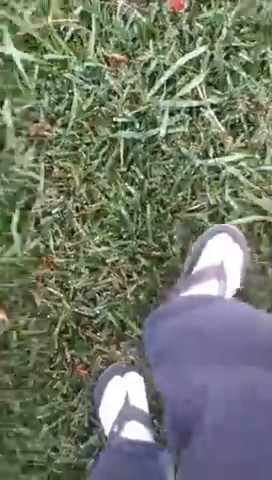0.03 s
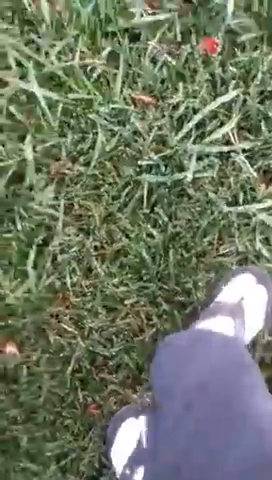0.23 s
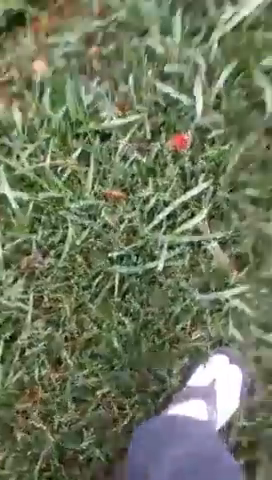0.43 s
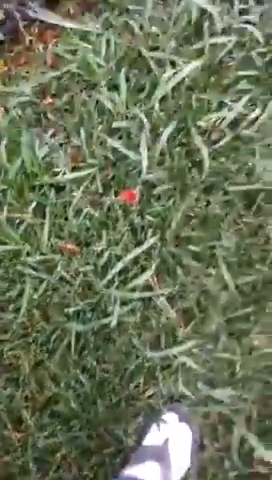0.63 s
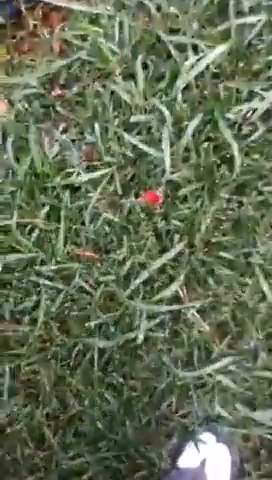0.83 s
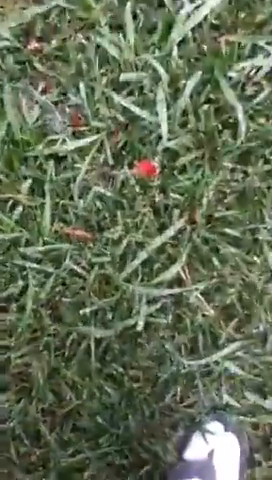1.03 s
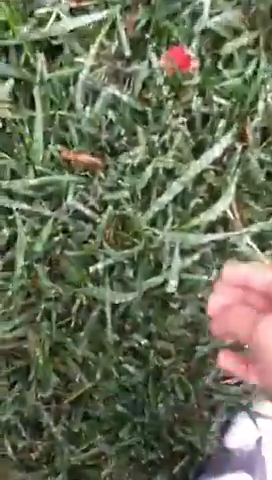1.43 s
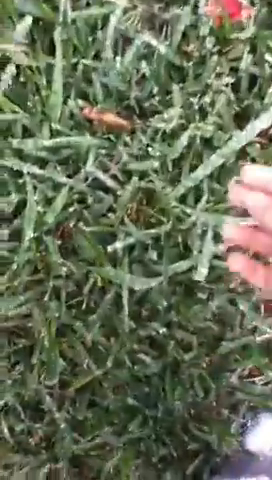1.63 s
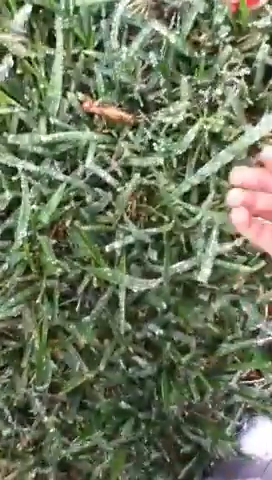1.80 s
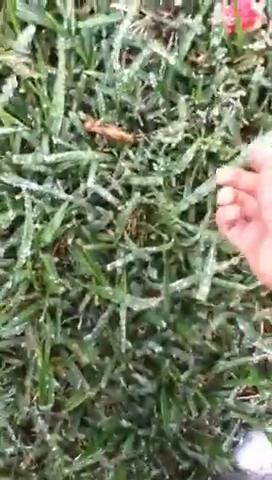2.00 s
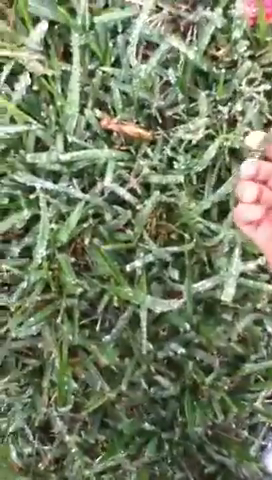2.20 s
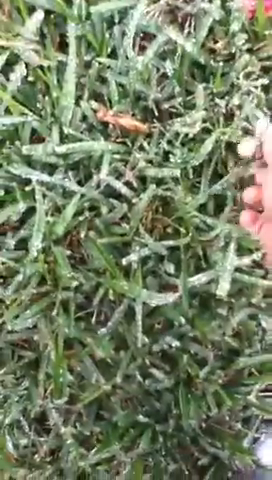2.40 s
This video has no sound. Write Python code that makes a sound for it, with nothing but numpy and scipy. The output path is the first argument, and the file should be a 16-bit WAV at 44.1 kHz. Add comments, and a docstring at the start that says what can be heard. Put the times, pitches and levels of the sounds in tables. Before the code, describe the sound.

Two slow footsteps crunch on stiff, frosty grass, heard from just above in the open air. Then clothes rustle faintly and fingers brush the frozen blades with small ticks and snaps, over a low distant rumble.

```python
"""Two slow steps on frozen grass, heard from above in the open air over a low distant rumble.
As each sole lands, frost crackles off the blades by brittle fracture, stiff stems crunch, single
blades snap and the turf gives under the weight. From about 1.5 s the walker crouches with a faint
friction rustle of clothes, then fingers the blades, which tick and snap."""
import sys
import numpy as np
from scipy import signal
from scipy.fft import rfft, irfft, next_fast_len
from scipy.io import wavfile
from scipy.ndimage import uniform_filter1d

SR = 44100
rng = np.random.default_rng(int(sys.argv[2]) if len(sys.argv) > 2 else 0)


def to_wav(sig):
    """Store sig (one row per channel, or 1-D mono) as 16-bit WAV at the path in sys.argv[1].

    Samples outside -1..1 are clipped; the rate is SR.
    """
    pcm = np.clip(np.atleast_2d(sig), -1, 1) * 32767
    pcm = np.round(pcm).astype(np.int16)
    wavfile.write(sys.argv[1], SR, pcm.T)  # frames by channels


N = 112454
FULL_LOAD_DB = -26   # reference for the load of a step and the strength of a snap


def from_db(db):
    """Amplitude ratio: a factor of ten for every 20 dB."""
    return 10 ** (np.asarray(db) / 20)


def level(rows):
    """Envelope interpolated in decibels between (seconds, dB) points, silent outside them."""
    s, db = np.transpose(rows)
    t = np.arange(N) / SR
    return from_db(np.interp(t, s, db)) * (t >= s[0]) * (t <= s[-1])


def swells(rows, roundness=1):
    """Incoherent sum of swells, each 10 dB down one rise time before and one fall time after its peak."""
    t = np.arange(N) / SR
    power = np.zeros(N)
    for peak_s, db, rise, fall in rows:
        distance = np.maximum((peak_s - t) / rise, (t - peak_s) / fall)
        drop_db = np.minimum(10 * distance ** roundness, 100)
        power += from_db(db - drop_db) ** 2
    return np.sqrt(power)


def colour(x, spectrum):
    """Minimum-phase filtering: a folded cepstrum imposes the spectrum causally; the result has unit RMS."""
    size = 2 * next_fast_len(N)
    hz, db = np.transpose(spectrum)
    bins = np.maximum(np.arange(size // 2 + 1) * SR / size, 1)
    gain = from_db(np.interp(np.log(bins), np.log(hz), db))
    cepstrum = irfft(np.log(gain))
    cepstrum[1:size // 2] *= 2
    cepstrum[size // 2 + 1:] = 0
    shaped = irfft(rfft(x, size) * np.exp(rfft(cepstrum)))[:N]
    return shaped / np.sqrt(np.mean(shaped ** 2) + 1e-20)


def ring(x, hz, q):
    """Forced response of two heavily damped resonators in cascade."""
    hz = min(hz, .4 * SR)
    band = signal.iirpeak(hz, max(q, .45, 2.2 * hz / SR), fs=SR)
    return signal.lfilter(*band, signal.lfilter(*band, x + 1e-18))


def crackle(spectrum, per_s, spread_db, q, band_hz):
    """Shot noise: impulses of random size excite random resonances; the level is evened out over 25 ms."""
    sizes = from_db(spread_db * np.minimum(rng.exponential(1, N), 3)) * rng.choice([-1, 1], N)
    clicks = sizes * (rng.random(N) < per_s / SR)
    pitches = np.geomspace(*band_hz, 20)
    pitch_index = rng.integers(0, len(pitches), N)
    ticks = sum(ring(clicks * (pitch_index == k), hz, q) for k, hz in enumerate(pitches))
    ticks = colour(ticks, spectrum)
    power = uniform_filter1d(uniform_filter1d(ticks ** 2, SR // 40), SR // 80)
    return ticks / np.sqrt(power + .02)


# Spectra of the distant rumble and the hiss. Each row: frequency in Hz, relative level in dB.
RUMBLE_SPECTRUM = [(20, -63), (48, -14.5), (100, 6), (160, 1.5), (230, -3.5), (800, -23), (2000, -54)]
AIR_SPECTRUM = [(700, -7.5), (2200, -18.5), (6000, -19), (15800, -24)]

def outdoors(rumble_db=-51, air_db=-54):
    """Stationary ambient noise: a distant rumble and a thin hiss."""
    rumble = from_db(rumble_db) * colour(rng.standard_normal(N), RUMBLE_SPECTRUM)
    hiss = from_db(air_db) * colour(rng.standard_normal(N), AIR_SPECTRUM)
    return rumble + hiss


# Spectrum of rubbing fabric. Each row: frequency in Hz, relative level in dB.
CLOTH_SPECTRUM = [(100, -35), (220, 15), (1200, 13.5), (3000, 6.5), (9000, -1.5), (15800, -40)]
# Envelope of the rustle. Each row: time in seconds, level in dB.
RUSTLE_LEVEL = [(0.15, -77), (1.3, -56), (1.52, -51.5), (1.93, -50.5), (2.12, -55), (2.55, -85)]

def clothes():
    """Friction noise: fabric rubs softly as the walker bends down and reaches out."""
    rustle = crackle(CLOTH_SPECTRUM, per_s=3900, spread_db=2.0, q=0.92, band_hz=(260, 9700))
    return level(RUSTLE_LEVEL) * rustle


# Spectrum of stroked blades. Each row: frequency in Hz, relative level in dB.
BLADE_SPECTRUM = [(300, -41), (1000, 13.5), (10000, 11.5), (15800, 1)]
# Finger strokes. Each row: peak time in seconds, level in dB, rise and fall in seconds.
FINGER_STROKES = [(1.695, -39, 0.039, 0.053), (2.134, -47, .004, 0.034), (2.26, -49, 0.072, 0.25),
                  (2.342, -43, 0.027, 0.0081), (2.475, -47.5, 0.07, 0.048), (2.542, -41.5, 0.0048, 0.015)]

def fingers():
    """Sliding contact: tiny fractures crackle as fingers stroke the frozen blades."""
    ticks = crackle(BLADE_SPECTRUM, per_s=5500, spread_db=6.0, q=1.7, band_hz=(1280, 14600))
    return swells(FINGER_STROKES, roundness=0.5) * ticks


# Single blades breaking. Each row: start in seconds, strength in dB, pitch in Hz.
BLADE_SNAPS = [(0.1765, -30.5, 1810), (0.245, -24, 2050), (0.3417, -11.5, 7850), (0.419, -19, 1810),
               (0.445, -16, 2480), (0.498, -23, 770), (0.5804, -21, 2520), (0.581, -22, 646),
               (0.5865, -18, 3020), (0.604, -18.5, 3270), (0.617, -20, 3140), (0.627, -26, 2800),
               (0.6572, -27, 7000), (0.6905, -26, 2616), (0.791, -28, 6540), (0.8143, -30.5, 4640),
               (0.866, -37, 5500), (0.956, -26, 2280), (1.0445, -14, 2300), (1.2335, -23, 675),
               (1.279, -18.5, 5800), (1.32, -19.5, 4830), (1.3459, -26, 2550), (1.3822, -18.5, 2400),
               (1.3835, -17, 6650), (1.3925, -22.5, 790), (1.4027, -20, 2870), (1.435, -22.5, 3450),
               (1.5005, -30, 1300), (1.7228, -25, 3800), (1.7371, -27, 9700), (1.7508, -24, 8700),
               (1.781, -27.5, 3350), (2.2763, -28, 2470), (2.318, -31.5, 3500), (2.3663, -27.5, 2740),
               (2.371, -25, 9200), (2.378, -30, 4400), (2.4497, -26, 7550), (2.457, -24, 3800),
               (2.4959, -27.5, 4350), (2.5305, -29, 4120), (2.539, -25.5, 11000)]

def snaps(gain_db=9, splinter_db=-3, splinter_growth=0.62, splinter_decay_s=0.0031):
    """Impulse excitation: a crack and its splinters drive a damped resonance; hard breaks splinter more."""
    out = np.zeros(N + SR)
    t = np.arange(SR // 50) / SR
    for start_s, db, hz in BLADE_SNAPS:
        spray = np.exp(-t / splinter_decay_s) * rng.standard_normal(len(t)) * (t > 1 / hz)
        spray_db = splinter_db + splinter_growth * (db - FULL_LOAD_DB)   # energy relative to the crack
        fracture = (t == 0) + from_db(spray_db) * spray / np.linalg.norm(spray)
        tick = ring(fracture, hz, q=1.0)
        start = int(start_s * SR)
        out[start:start + len(t)] += from_db(db + gain_db) * tick / np.linalg.norm(tick)
    return out[:N]


# Load on the frost, one list for each step. Each row: time in seconds, load in dB.
STEP_LOADS = [
    [(0.195, -49.5), (0.22, -58.5), (0.226, -43), (0.265, -37), (0.295, -28), (0.355, -28.5), (0.42, -34.5),
     (0.61, -38.5), (0.74, -46.5), (0.78, -51.5), (0.88, -57)],
    [(0.88, -57), (0.935, -49.5), (1.0, -33.5), (1.085, -25.5), (1.145, -31.5), (1.23, -32.5),
     (1.28, -38.5), (1.305, -42.5), (1.36, -42.5), (1.405, -37.5), (1.44, -43.5), (1.47, -53.5),
     (1.62, -60)],
]
# Tufts flattening and turf yielding. Each row: peak time in seconds, level in dB, rise and fall in seconds.
STEM_CRUSHES = [(0.19, -34, 0.0043, 0.0037), (0.298, -26.5, 0.027, 0.047), (0.36, -38.5, 0.041, 0.23),
                (0.605, -48.5, 0.11, 0.031), (1.044, -29.5, 0.046, 0.045), (1.085, -34.5, 0.057, 0.085),
                (1.245, -36.5, 0.0096, 0.03), (1.386, -45, 0.004, 0.049)]
TURF_PRESSES = [(0.29, -34.5, 0.036, 0.16), (0.495, -38, 0.11, 0.11), (0.59, -38.5, 0.057, 0.032),
                (1.05, -37, 0.052, 0.071), (1.243, -36, 0.064, 0.029), (1.39, -40, 0.06, 0.052),
                (1.552, -48, 0.0082, 0.023)]
# Spectra of the four layers underfoot. Each row: frequency in Hz, relative level in dB.
ICE_SPECTRUM = [(1500, -38), (4500, -12), (9500, -7.5), (12500, -11.5), (15800, -12.5)]
FROST_SPECTRUM = [(200, -1.5), (500, -10), (1200, -5.5), (3000, 4.5), (7000, -0.5), (11000, -3),
                  (15800, -16)]
STEM_SPECTRUM = [(250, -34), (950, 0.5), (1450, 5), (1800, 0), (3100, -1.5), (4000, -25), (15000, -20)]
TURF_SPECTRUM = [(150, -53), (300, -6), (450, -2), (750, -3.5), (1600, -9.5), (5000, -16)]

def footsteps(ice_db=-30.5, ice_growth=0.96, frost_db=-30, frost_growth=0.85):
    """Brittle fracture under load: fine ice sizzles, frosted blades crackle, stems crunch, turf gives."""
    load = sum(level(step) for step in STEP_LOADS) / from_db(FULL_LOAD_DB)
    activity = load + 0.055   # more load breaks more blades per second
    ice = crackle(ICE_SPECTRUM, per_s=40000 * activity, spread_db=8.0, q=2.65, band_hz=(3500, 14900))
    frost = crackle(FROST_SPECTRUM, per_s=9000 * activity, spread_db=1.5, q=1.52, band_hz=(577, 14100))
    stems = crackle(STEM_SPECTRUM, per_s=2600, spread_db=4.5, q=1.25, band_hz=(696, 4960))
    turf = crackle(TURF_SPECTRUM, per_s=650, spread_db=4.5, q=1.49, band_hz=(466, 1300))
    return (from_db(ice_db) * load ** ice_growth * ice
            + from_db(frost_db) * load ** frost_growth * frost
            + swells(STEM_CRUSHES) * stems
            + swells(TURF_PRESSES, roundness=0.82) * turf)


def scatter(x, tail_db=-10.5, decay_s=0.012):
    """Diffuse reflection: the ground and the walker's body add a very short tail."""
    t = np.arange(SR // 10) / SR
    tail = rng.standard_normal(len(t)) * np.exp(-t / decay_s)
    return x + from_db(tail_db) * signal.fftconvolve(x, tail / np.linalg.norm(tail))[:N]


def scene():
    """Superposition at one point; only the footsteps and finger strokes are scattered."""
    return (scatter(footsteps() + fingers()) + snaps() + clothes() + outdoors())[None]


def record(dry):
    """Band limiting: an elliptic low-pass cuts the highest treble steeply."""
    cutoff_hz = 15600
    return signal.sosfilt(signal.ellip(10, .2, 80, cutoff_hz, fs=SR, output="sos"), dry)


dry = scene()
out = record(dry)
to_wav(out)
```